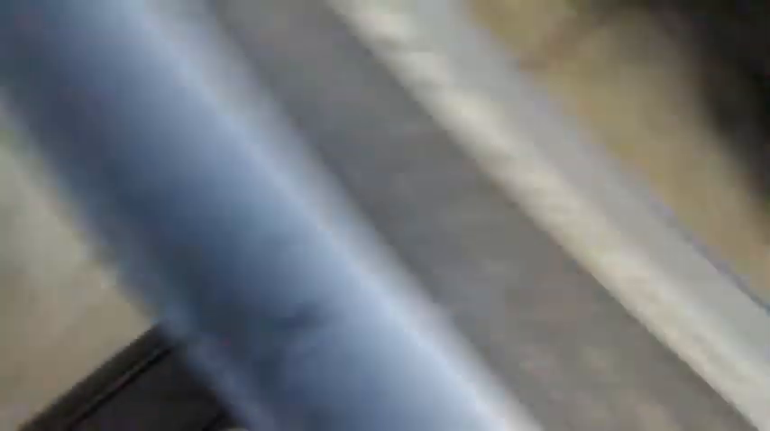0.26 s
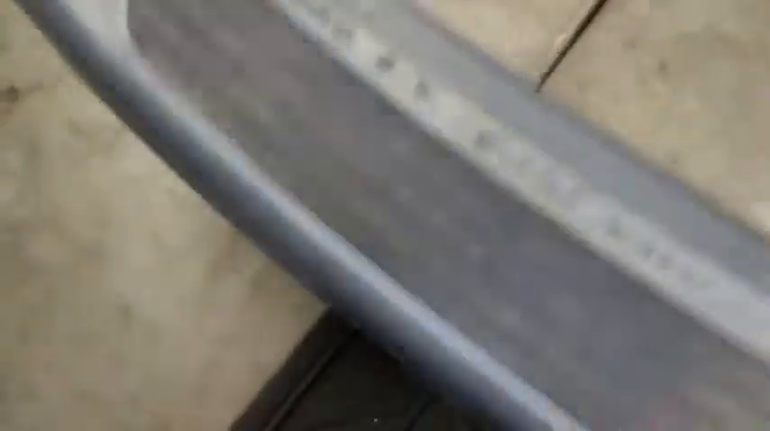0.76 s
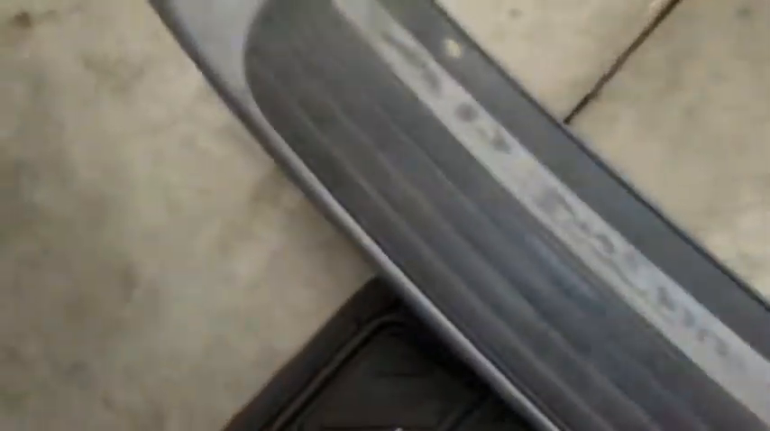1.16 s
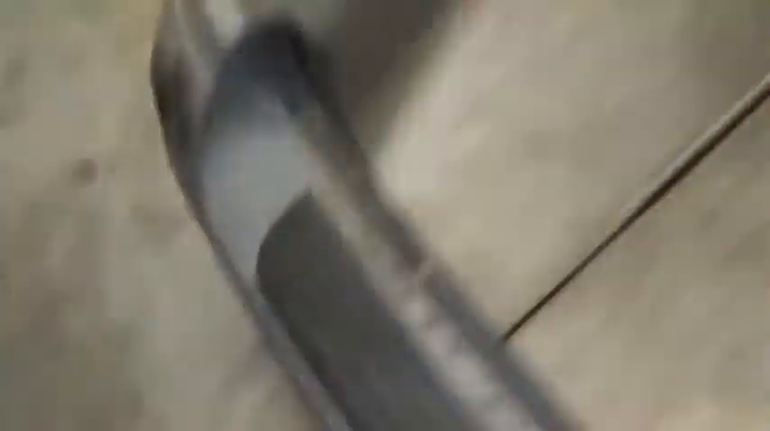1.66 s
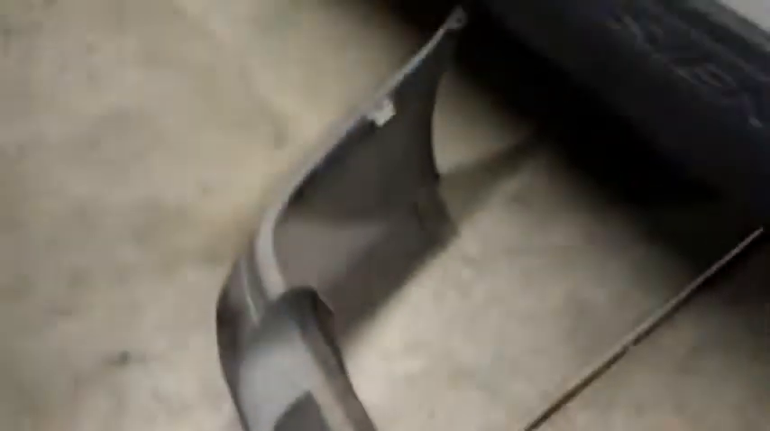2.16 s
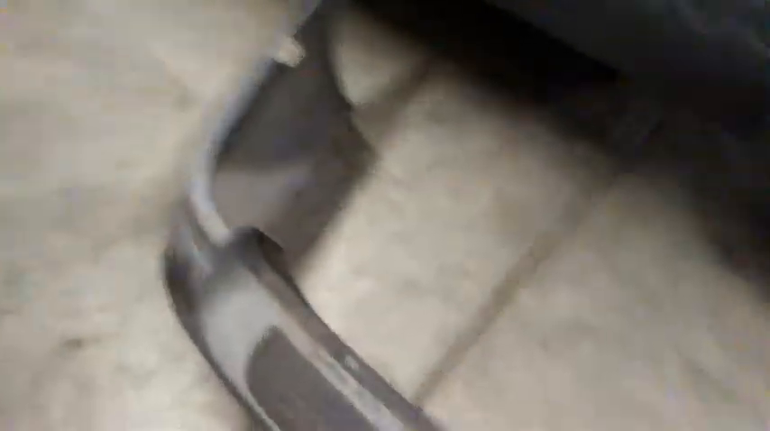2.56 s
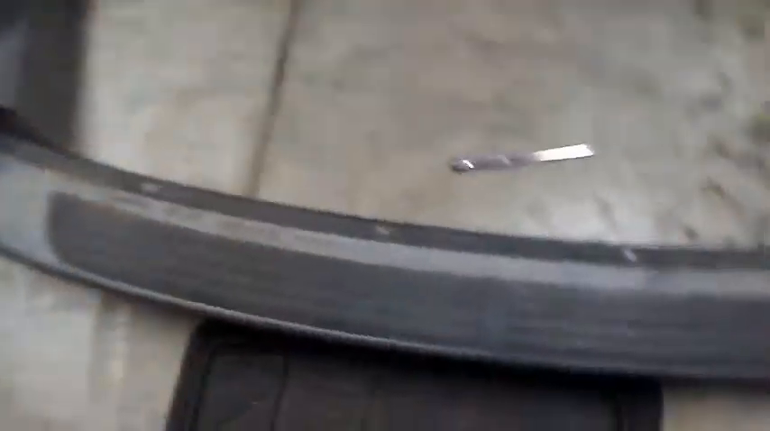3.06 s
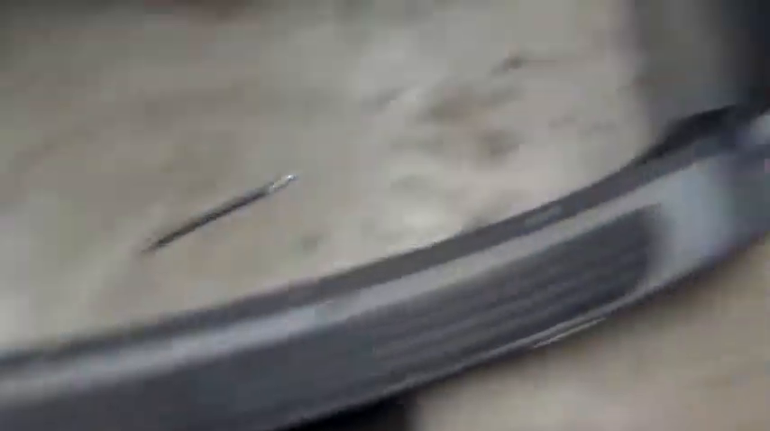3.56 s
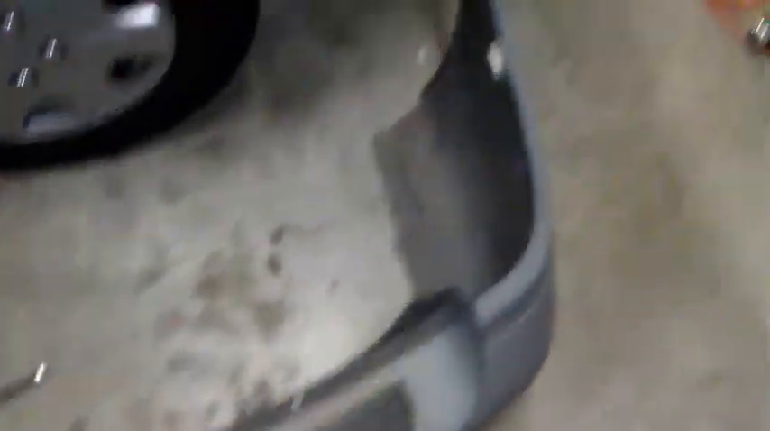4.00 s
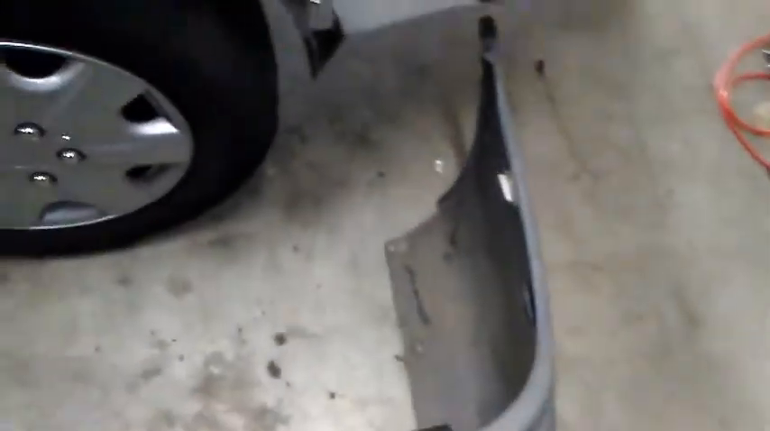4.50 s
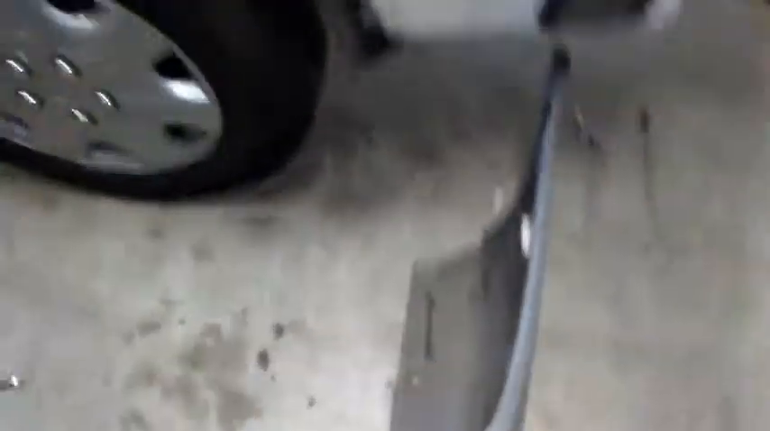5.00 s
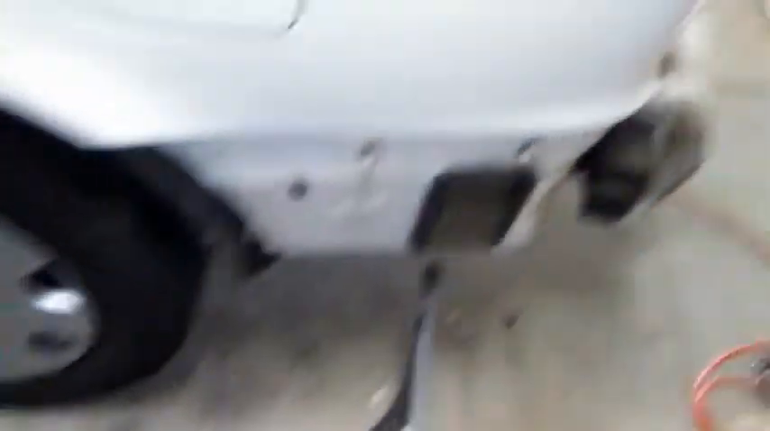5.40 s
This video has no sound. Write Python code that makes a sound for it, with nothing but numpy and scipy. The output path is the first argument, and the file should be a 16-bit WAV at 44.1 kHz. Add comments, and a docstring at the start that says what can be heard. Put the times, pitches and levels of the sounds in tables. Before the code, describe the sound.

Close handheld microphone in a reverberant garage. After faint scuffs, a big flexible plastic bumper cover thumps onto concrete, then bangs again in a loud cluster around one second. Short juddering drags and ticks follow, with a brief squeak near two seconds. The rest is quiet: low rumble, dull air, faint distant knocks, soft microphone bumps and light clothing swishes at the end.

```python
"""Plastic bumper cover on a garage floor

A loose bumper cover is lowered onto concrete and dragged clear: chirped bending waves ring panel modes,
noise bursts with echoes and reverberation make the edge clacks, random slips make judder and scrape.
Filtered contacts give ticks, chirp and faint knocks; shaped friction noise gives shoe scuffs and cloth.
Low rumble, dull room tone, hiss and soft 57 Hz-range microphone bumps lie underneath.
"""
import sys
import numpy as np
from scipy import signal
from scipy.fft import rfft, irfft
from scipy.io import wavfile
from scipy.ndimage import uniform_filter1d

SR = 44100
rng = np.random.default_rng(int(sys.argv[2]) if len(sys.argv) > 2 else 0)


def log_audio(samples):
    """Write samples as a 16-bit WAV file to the path given in sys.argv[1]."""
    # one column per channel
    frames = np.atleast_2d(samples).T
    # limit to full scale, then quantise
    limited = np.clip(frames, -1, 1)
    pcm = np.round(limited * 32767).astype(np.int16)
    wavfile.write(sys.argv[1], SR, pcm)


N = 249027
TIME_S = np.arange(N) / SR
TAIL_S = np.arange(int(0.9 * SR)) / SR  # time axis of one event

# Event levels below are before the trims inside the functions.
# Room tone: (time [s], level [dB])
ROOM_TONE = [(2.45, -57.5), (2.6, -60), (3.96, -71), (5.65, -64.5)]
# Scuffs of plastic and soles: (centre [s], half length [s], level [dB], resonance [Hz])
SCUFFS = [(0.005, 0.019, -49, 4970), (0.108, 0.051, -58, 5200), (0.175, 0.014, -41.5, 8450),
          (0.225, 0.018, -40, 7600), (0.618, 0.031, -48.5, 7450), (1.849, 0.03, -32, 3460),
          (2.51, 0.0089, -43, 2970), (2.936, .022, -53.5, 1853), (3.468, 0.04, -59, 6510),
          (4.497, .011, -55.5, 3200), (4.533, 0.023, -54.5, 2700), (4.966, 0.02, -48.5, 1380)]
# Light dry ticks: (time [s], level [dB], resonance [Hz])
TICKS = [(0.025, -50, 1500), (0.119, -53.5, 900), (0.624, -38.5, 714), (1.197, -28.5, 850),
         (1.431, -41.5, 750), (1.461, -32, 1600), (1.538, -32.5, 1000), (1.598, -33, 1100),
         (2.343, -52, 1265), (3.662, -59.5, 860), (4.421, -60.5, 1190), (4.807, -63, 1400),
         (4.944, -54.5, 1470)]
# Panel flexing: (time [s], level [dB], weight [0 glancing, 1 full drop, more a slam], strongest pitch [Hz])
THUDS = [(0.179, -38.5, 0.058, 169.6), (0.297, -14, 0.93, 350.4), (0.33, -24.5, 1.1, 396.7),
         (0.385, -25, 0, 339.6), (0.618, -32.5, .7, 147), (0.8, -13.5, 0.77, 171.8),
         (0.889, -22.5, 0.27, 301), (0.963, -14.5, 1.4, 190), (0.995, -13, 0.27, 254),
         (1.1105, -11.5, 0.47, 220), (1.158, -15.5, 0.34, 280), (1.194, -21, 0.029, 236),
         (1.429, -32.5, 0.42, 219), (1.452, -27.5, 0.25, 211), (1.498, -18, 0.38, 212),
         (1.556, -20, 0.49, 290), (1.701, -29, 0.2, 290), (1.921, -22, .85, 310), (2.065, -23.5, 0.29, 283),
         (2.106, -29.5, 0.4, 315)]
# Edge on concrete: (time [s], level [dB], top band re level [dB], echoes and room [dB])
CLACKS = [(0.312, -15, -9.5, 0), (0.3365, -26, -10, -3), (0.439, -33.5, -14, 0), (0.8138, -16.5, -8, -0.5),
          (0.899, -36, -5, -10), (0.9739, -13.5, -5.5, 1.5), (1.0169, -20.5, -13, -7),
          (1.1245, -21.5, -11, -5.5), (1.193, -37, -11, -4), (1.459, -43, -9.5, -0.5),
          (1.499, -33.5, -8, 2), (1.517, -33.5, -14.5, -2), (1.566, -31.5, -15.5, -4.5),
          (1.5979, -39.5, -12, 1), (1.9033, -40, -4, 5), (2.1643, -40, -2.5, -3), (2.4581, -50, -16, -4),
          (2.501, -52, -6, -3.5)]
# Sag of the whole cover: (time [s], level [dB])
WOBBLES = [(0.321, -14), (1.452, -32), (1.92, -30), (2.106, -30.5)]
# Tugs along the floor: (time [s], length [s], judder [dB], grit [dB])
TUGS = [(1.202, 0.35, -17, -36.5), (1.495, 0.073, -20, -33), (1.553, 0.17, -15.5, -23.5),
        (1.855, 0.15, -26.5, -42), (1.992, 0.11, -42, -35), (2.062, 0.17, -19, -38.5),
        (2.265, 0.056, -54, -35)]
# Hollow knocks and steps: (time [s], level [dB], brightness [dB/octave])
KNOCKS = [(2.462, -49, -2.5), (3.374, -63, 3.5), (3.752, -62, -5.5), (3.839, -67.5, -3.5),
          (4.117, -55.5, -1.5), (5.45, -54.5, 1.5)]
# Soft bumps of the hand-held microphone: (time [s], level [dB])
BUMPS = [(2.56, -43), (2.83, -48.5), (3.02, -45.5), (3.26, -47), (3.53, -48.5), (3.91, -45), (4.14, -49.5),
         (4.94, -47), (5.5, -46)]
# Clothes swishing: (centre [s], half length [s], level [dB])
SWISHES = [(4.984, 0.0098, -41), (5.04, 0.012, -42.5), (5.108, 0.011, -41), (5.137, .018, -40),
           (5.194, 0.021, -49.5), (5.27, 0.027, -47.5), (5.389, 0.057, -58), (5.631, 0.046, -60)]

# Bending modes of the panel: (frequency [Hz], level [dB], t60 [s])
PANEL_MODES = [(88, 0.5, 0.2), (109.3, 0, 0.41), (134.85, -1.5, 0.49), (156, -5, 0.95), (175, -1.5, 0.32),
               (204.8, -3, 0.42), (236.6, -0.5, .4), (277.3, 3, 0.32), (316, 0.5, .3), (344, -0.5, 0.16),
               (413, -1.5, 0.13), (515, -10.5, 0.23), (701, 0.5, .16), (766.6, -8, 0.25), (919, -0.5, 0.1),
               (1018, -8, 0.17), (1330, -15.5, 0.054)]
# Deepest modes of the cover: (frequency [Hz], level [dB], t60 [s])
WOBBLE_MODES = [(52, -2.5, .38), (83, -0.5, 0.2), (117, -3.5, 0.18)]
# Resonances of the stiff rim: (frequency [Hz], width [Hz], level [dB])
RIM_MODES = [(392, 32, 1.5), (670, 46, 5), (740, 43, 2), (910, 15, 2), (1020, 36, 6.5), (1380, 19, -1),
             (2720, 400, 1.5), (3190, 100, 5.5), (6340, 260, 1)]
# Drive of the modes by dragging: (frequency [Hz], level [dB])
GROAN_SPECTRUM = [(50, -1), (110, 5), (170, 7), (240, 2), (330, 1), (450, 0), (1000, -10.5), (3000, -19)]
# Bending wave: (frequency [Hz], relative density [dB/Hz])
BEND_SPECTRUM = [(25, -8.5), (75, -0.5), (150, 3), (300, 4.5), (400, -0.5), (520, -4.5), (1000, -9),
                 (1700, -18.5), (2800, -24.5), (5000, -37.5), (16000, -70.5)]
# Edge slap: (frequency [Hz], relative density [dB/Hz])
EDGE_SPECTRUM = [(100, -8), (300, 7), (550, 8), (1000, 3), (1500, 2.5), (2100, 5), (3100, 5), (4000, -0.5),
                 (5300, -3.5), (6300, -1), (7500, -4.5), (10000, -11.5), (13000, -18), (16000, -26)]
# Hollow knock: (frequency [Hz], relative density [dB/Hz])
KNOCK_SPECTRUM = [(100, -19), (250, -2), (345, 13), (440, 3), (700, 1), (1800, 0), (2600, -4), (3600, -7),
                  (4800, -10.5), (7000, -7), (16000, -18)]
# Scrape on concrete: (frequency [Hz], relative density [dB/Hz])
GRIT_SPECTRUM = [(150, -13.5), (500, 3), (1000, 3), (1900, 3.5), (3200, 1.5), (4800, 0), (8500, -1),
                 (11000, -4), (16000, -21.5)]
# Fabric rub: (frequency [Hz], relative density [dB/Hz])
CLOTH_SPECTRUM = [(150, -29.5), (500, -11.5), (2000, -8.5), (4600, -8.5), (5800, -0.5), (7500, -2.5),
                  (9400, 1.5), (12500, -4), (16000, -13.5)]
# Background noise: (frequency [Hz], relative density [dB/Hz])
AIR_SPECTRUM = [(25, -6.5), (58, 0), (90, -9), (140, -13.5), (210, -21.5), (320, -21), (600, -28.5),
                (1000, -41), (2000, -44), (5000, -47), (16000, -50.5)]
# Garage decay: (frequency [Hz], t60 [s])
GARAGE_T60 = [(80, 0.99), (250, 0.49), (700, 0.64), (2000, 0.53), (5000, 0.49), (9000, 0.3), (15000, 0.27)]
# Echoes of floor, car and walls: (delay [s], level [dB])
ECHOES = [(.0045, -8), (.0138, -5.5), (.0255, -11.5), (.039, -9)]


def from_db(db):
    """Decibels to amplitude gain."""
    return 10 ** (np.asarray(db) / 20)


def rms_one(x):
    """Scale to unit mean power."""
    return x / np.sqrt(np.mean(x ** 2) + 1e-20)


def unit(x):
    """Scale to unit energy."""
    return x / np.sqrt(np.sum(x ** 2) + 1e-20)


def unit_in_window(window_s):
    """Gain that brings unit energy to unit mean power over a window."""
    return np.sqrt(window_s * SR)


def dying(t60_s):
    """Exponential envelope losing 60 dB in t60_s."""
    return np.exp(-np.log(1000) * TAIL_S / max(t60_s, 1e-4))


def build_up(rise_s):
    """Exponential onset toward one."""
    return 1 - np.exp(-TAIL_S / rise_s)


def at_hz(points, hz):
    """Interpolate a table on a log-frequency axis."""
    table_hz, value = np.transpose(points)
    return np.interp(np.log(np.maximum(hz, 1)), np.log(table_hz), value)


def colour(x, spectrum, size=4096):
    """Causal minimum-phase filter with the given spectrum."""
    gain = from_db(at_hz(spectrum, np.fft.rfftfreq(size, 1 / SR)))
    cepstrum = irfft(np.log(gain))
    # folding the cepstrum makes the phase minimal
    cepstrum[1:size // 2] *= 2
    cepstrum[size // 2 + 1:] = 0
    impulse = irfft(np.exp(rfft(cepstrum)))
    return signal.fftconvolve(x, impulse)[:len(x)]


def resonant(spectrum, centre_hz, height_db, octaves):
    """A spectrum with one broad resonance added."""
    hz = np.geomspace(30, 18000, 120)
    hump = np.exp(-(np.log2(hz / centre_hz) / octaves) ** 2)
    return np.c_[hz, at_hz(spectrum, hz) + height_db * hump]


def resonate(x, hz, q):
    """Two-pole resonance with unit peak gain."""
    return signal.lfilter(*signal.iirpeak(hz, q, fs=SR), x)


def butter(x, order, hz, kind="low"):
    """Butterworth filter."""
    return signal.sosfilt(signal.butter(order, hz, kind, fs=SR, output="sos"), x)


def add(out, time_s, sound):
    """Mix a sound in at time_s."""
    start = max(round(time_s * SR), 0)
    out[start:start + len(sound)] += sound[:N - start]


def voiced(x, edges_hz, levels_db, window_s):
    """Filter a blow so that its opening window has about the given level in each band."""
    size = int(window_s * SR)
    power = 2 * np.abs(rfft(x[:size], SR)) ** 2 / (size * SR)  # 1 Hz bins
    correction = []
    for lo, hi, db in zip(edges_hz, edges_hz[1:], levels_db):
        band_db = 10 * np.log10(power[int(lo):int(hi)].sum())
        correction.append((np.sqrt(lo * hi), db - band_db))
    return colour(x, correction)


def garage(build_s=0.0073):
    """Diffuse room tail: octaves of noise, each dying at its own rate."""
    centres_hz = 62.5 * 2.0 ** np.arange(9)
    white = rfft(rng.standard_normal(len(TAIL_S)))
    hz = np.fft.rfftfreq(len(TAIL_S), 1 / SR)
    tail = np.zeros(len(TAIL_S))
    for centre_hz, share in zip(centres_hz, np.eye(len(centres_hz))):
        octave = irfft(white * at_hz(np.c_[centres_hz, share], hz), len(TAIL_S))
        tail += octave * dying(at_hz(GARAGE_T60, centre_hz))
    return unit(tail * build_up(build_s))


def in_room(x, room_db):
    """A sound plus its reverberation."""
    return x + from_db(room_db) * signal.fftconvolve(x, garage())[:len(x)]


def burst(t60_s):
    """Dense decaying noise of unit energy."""
    return unit(rng.standard_normal(len(TAIL_S)) * dying(t60_s))


def contact(t60_s, chatter_db, chatter_t60_s):
    """Hard touch: a brief crack and a fading chatter of tiny rebounds, 3000 per second."""
    rebounds = burst(chatter_t60_s) * (rng.random(len(TAIL_S)) < 3000 / SR)
    return burst(t60_s) + from_db(chatter_db) * unit(rebounds)


def grains(per_s, spread_db):
    """Random slips of uneven size and sign, at unit power."""
    sizes = from_db(spread_db * np.minimum(rng.exponential(1, N), 4))
    signs = rng.choice([-1, 1], N)
    return rms_one(sizes * signs * (rng.random(N) < per_s / SR))


def friction():
    """Thousands of tiny slips a second merge into a slightly grainy hiss."""
    return grains(per_s=9000, spread_db=3)


def catching(catch_db=4):
    """Friction in which the edge now and then snags and lets go."""
    snags = rng.uniform(0.3, 1, N) ** 2 * (rng.random(N) < 70 / SR)
    grip = signal.fftconvolve(snags, dying(0.025))[:N]
    dull = butter(grip * rng.standard_normal(N), 1, 4000)
    return friction() + from_db(catch_db) * rms_one(dull)


def strokes(rubs, spectrum, resonance_db, room_db):
    """Short rubs: dense friction that swells and fades as a Gaussian."""
    out = np.zeros(N)
    slips = friction()[:len(TAIL_S)]
    for centre_s, half_s, db, slope_db_per_octave, peak_hz in rubs:
        tilted = [(hz, level + slope_db_per_octave * np.log2(hz)) for hz, level in spectrum]
        shape = resonant(tilted, peak_hz, resonance_db, octaves=0.28)
        rub = rms_one(colour(rng.permutation(slips), shape))
        start_s = max(centre_s - 4 * half_s, 0)
        swell = np.exp(-((start_s + TAIL_S - centre_s) / half_s) ** 2 / 2)
        add(out, start_s, from_db(db) * rub * swell)
    return in_room(out, room_db)


def panel_ring():
    """Panel modes, excited with random strengths and signs for each point of contact."""
    strengths = from_db(rng.normal(0, 2.5, len(PANEL_MODES))) * rng.choice([-1, 1], len(PANEL_MODES))
    ring = np.zeros(len(TAIL_S))
    for strength, (hz, db, t60_s) in zip(strengths, PANEL_MODES):
        ring += strength * from_db(db) * np.sin(2 * np.pi * hz * TAIL_S) * dying(t60_s)
    return unit(ring)


def rim(x):
    """The stiff rim boosts or cuts the sound at its own pitches."""
    return x + sum((from_db(db) - 1) * resonate(x, hz, hz / width_hz) for hz, width_hz, db in RIM_MODES)


def background(rumble_db=-56, murk_db=2.0, hiss_db=-68):
    """Three bands of one noise: low rumble, the room's varying dull tone, steady hiss."""
    noise = colour(rng.standard_normal(N), AIR_SPECTRUM)
    rumble = rms_one(butter(noise, 3, (41, 175), "band"))
    murk = rms_one(butter(noise, 3, (180, 1000), "band"))
    hiss = rms_one(butter(noise, 3, (900, 18000), "band"))
    times_s, levels_db = np.transpose(ROOM_TONE)
    murk_gain = from_db(np.interp(TIME_S, times_s, levels_db) + murk_db)
    return rumble * from_db(rumble_db) + murk * murk_gain + hiss * from_db(hiss_db)


def scuffs(tilt_db_per_octave=0.6, tilt_rise_db=2.5, level_db=-1.0):
    """Friction strokes of plastic and soles; the higher the resonance, the brighter the tilt."""
    rubs = []
    for centre_s, half_s, db, hz in SCUFFS:
        # the tilt grows by tilt_rise_db per octave of resonance above 4 kHz
        slope = tilt_db_per_octave + tilt_rise_db * np.log2(hz / 4000)
        rubs.append((centre_s, half_s, db, slope, hz))
    return from_db(level_db) * strokes(rubs, GRIT_SPECTRUM, resonance_db=6.0, room_db=-6)


def ticks(t60_s=0.022, window_s=0.026, room_db=-9, q=1.5, dull_hz=2400, soft_s=0.0015):
    """Small parts touch: one brief, soft contact in a broad resonance."""
    out = np.zeros(N)
    for time_s, db, hz in TICKS:
        touch = contact(t60_s, chatter_db=-8.5, chatter_t60_s=0.1) * build_up(soft_s)
        add(out, time_s, from_db(db) * unit_in_window(window_s) * unit(resonate(touch, hz, q)))
    return in_room(butter(out, 2, dull_hz), room_db)


def thuds(level_db=-1.0, lag_s=0.001, window_s=0.032, build_s=0.0051, damping_hz=3200):
    """Bending waves travel faster at high pitch: a short falling chirp, then the panel rings."""
    travel = 0.0696  # arrival delay [s] = travel / sqrt(frequency [Hz])
    rattle_db, rattle_t60_s, room_db, ring_db = 1, 0.14, -3.5, -5
    glancing_bass_db, full_bass_db, glancing_knock_db, full_knock_db = -18, 1, -15, -0.5
    crack_db, crack_t60_s = -29, 0.05
    out, cracks = np.zeros(N), np.zeros(N)
    hz = np.fft.rfftfreq(len(TAIL_S), 1 / SR)
    chirp = irfft(np.exp(-4j * np.pi * travel * np.sqrt(hz)), len(TAIL_S)) * (TAIL_S < 0.1)
    build = build_up(build_s)
    for time_s, body_db, weight, pitch_hz in THUDS:
        # more weight: deeper bass (up to a full drop) and harder knock
        bass_db = body_db + np.interp(weight, [0, 1], [glancing_bass_db, full_bass_db])
        knock_db = body_db + glancing_knock_db * (1 - weight) + full_knock_db * weight
        # the wave bounces between the panel's borders
        reflections = from_db(rattle_db) * unit(burst(rattle_t60_s) * build)
        source = chirp + reflections + from_db(room_db) * garage()
        wave = unit(colour(source, resonant(BEND_SPECTRUM, pitch_hz, height_db=11, octaves=0.25)))
        sound = wave + from_db(ring_db) * panel_ring() * build
        thud = voiced(sound, (40, 130, 450, 2000), (bass_db, body_db, knock_db), window_s)
        add(out, time_s + lag_s, from_db(level_db) * thud)
        crack_gain = from_db(knock_db + crack_db) * unit_in_window(window_s)
        add(cracks, time_s + lag_s, crack_gain * burst(crack_t60_s))
    # soft plastic swallows the wave's treble; only a faint crack gets through
    return cracks + butter(out, 2, damping_hz)


def clacks(level_db=-0.5, window_s=0.039, room_db=-0.05):
    """The stiff edge slaps the concrete; near surfaces throw back scattered echoes."""
    crack_t60_s, echo_t60_s, tick_t60_s, tick_db = 0.02, 0.028, 0.01, -13
    mid_db, mid_follows = -15, 0.72
    out = np.zeros(N)
    spectrum = resonant(EDGE_SPECTRUM, centre_hz=6300, height_db=2.0, octaves=0.12)
    for time_s, clack_db, sharpness_db, wet_db in CLACKS:
        tick = from_db(tick_db) * burst(tick_t60_s)
        direct = tick + contact(crack_t60_s, chatter_db=-4.5, chatter_t60_s=0.072)
        echoes = np.zeros(len(TAIL_S))
        for delay_s, db in ECHOES:
            echoes += from_db(db) * np.interp(TAIL_S - delay_s, TAIL_S, burst(echo_t60_s), left=0)
        wet = echoes + from_db(room_db) * garage()
        sound = rim(colour(direct + from_db(wet_db) * wet, spectrum))
        # a harder slap is a shorter contact: the middle grows less than the treble
        levels_db = (mid_db + mid_follows * clack_db, clack_db, clack_db + sharpness_db)
        add(out, time_s, from_db(level_db) * voiced(sound, (500, 2000, 7500, 16000), levels_db, window_s))
    return out


def wobbles(build_s=0.0076, window_s=0.04):
    """The cover's weight lands and sets its deepest modes swinging at random phases."""
    out = np.zeros(N)
    for time_s, level_db in WOBBLES:
        swing = np.zeros(len(TAIL_S))
        for hz, db, t60_s in WOBBLE_MODES:
            swing += from_db(db) * np.sin(2 * np.pi * (hz * TAIL_S + rng.random())) * dying(t60_s)
        landing = unit(swing * build_up(build_s))
        add(out, time_s, from_db(level_db) * unit_in_window(window_s) * landing)
    return out


def drag(judder_db=-4, grit_db=-6, even_s=0.018, attack_s=0.0055, slowing_db=19.5):
    """Stick and slip keeps the panel's modes groaning while its edge rasps over the concrete."""
    judder, grit = np.zeros(N), np.zeros(N)
    for time_s, length_s, tug_judder_db, tug_grit_db in TUGS:
        # a tug breaks free at once, then fades by slowing_db over its length
        speed = build_up(attack_s) * from_db(-slowing_db * TAIL_S / length_s)
        add(judder, time_s, from_db(tug_judder_db + judder_db) * speed)
        add(grit, time_s, from_db(tug_grit_db + grit_db) * speed)
    shake = colour(signal.fftconvolve(friction(), panel_ring())[:N], GROAN_SPECTRUM)
    # friction limits the swing, so the groan stays even
    shake_power = uniform_filter1d(shake ** 2, int(even_s * SR))
    even_shake = shake / np.sqrt(np.maximum(shake_power, 1e-12))
    rasp = grit * rms_one(rim(colour(catching(), GRIT_SPECTRUM)))
    return judder * even_shake + in_room(rasp, room_db=-2.0)


def squeak(time_s=1.924, hz=4030, width_hz=290, level_db=-33, t60_s=0.033, window_s=0.023, room_db=-15):
    """The edge sticks on concrete and chirps once: a noise burst in a narrow resonance."""
    out = np.zeros(N)
    chirp = unit(resonate(burst(t60_s), hz, hz / width_hz))
    add(out, time_s, from_db(level_db) * unit_in_window(window_s) * chirp)
    return in_room(out, room_db)


def knocks(room_db=-5, window_s=0.045, soft_s=0.0043):
    """Light, distant knocks and steps: a hollow body tone under a click, tilted about 2 kHz."""
    out, room = np.zeros(N), garage()
    edges_hz = np.array([250, 600, 2000, 4500, 14000])
    octaves = np.log2(np.sqrt(edges_hz[:-1] * edges_hz[1:]) / 2000)
    band_db = np.array([-1.0, -4, 0.6, -3])  # body, middle, click, top
    spectrum = resonant(KNOCK_SPECTRUM, centre_hz=3520, height_db=3, octaves=0.11)
    for time_s, db, brightness in KNOCKS:
        direct = contact(t60_s=0.036, chatter_db=-5.5, chatter_t60_s=0.22) * build_up(soft_s)
        sound = colour(direct + from_db(room_db) * room, spectrum)
        add(out, time_s, voiced(sound, edges_hz, db + brightness * octaves + band_db, window_s))
    return out


def bumps(centre_hz=56.52, crest_s=0.031):
    """Microphone bumps: deep swells of a few cycles, pitch varying by up to 15 %."""
    out = np.zeros(N)
    swell = TAIL_S / crest_s * np.exp(1 - TAIL_S / crest_s)
    for time_s, db in BUMPS:
        hz = centre_hz * rng.uniform(0.85, 1.15)
        add(out, time_s, from_db(db) * swell * np.sin(2 * np.pi * hz * TAIL_S))
    return out


def clothes(tilt_db_per_octave=-0.55, fabric_hz=9340, level_db=-1):
    """Friction strokes, all with the colour of the same fabric."""
    rubs = [(centre_s, half_s, db, tilt_db_per_octave, fabric_hz) for centre_s, half_s, db in SWISHES]
    return from_db(level_db) * strokes(rubs, CLOTH_SPECTRUM, resonance_db=1, room_db=-11.0)


def scene():
    """Sum of all sources at one microphone, the same in both channels."""
    cover = ticks() + thuds() + clacks() + wobbles() + drag() + squeak()
    surroundings = background() + scuffs() + knocks() + bumps() + clothes()
    mono = cover + surroundings
    return np.array([mono, mono])


def record(dry):
    """Cut the deepest bass, round the loudest peaks, cut the top."""
    low_cut_hz, top_cut_hz, ceiling = 36, 15850, 0.76
    bass_cut = butter(dry, 3, low_cut_hz, "high")
    rounded = ceiling * np.tanh(bass_cut / ceiling)
    top_cut = signal.ellip(12, 0.1, 80, top_cut_hz, fs=SR, output="sos")
    return signal.sosfilt(top_cut, rounded)


dry = scene()
out = record(dry)
log_audio(out)
```